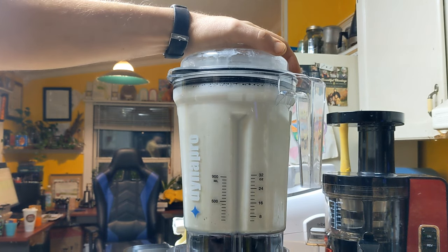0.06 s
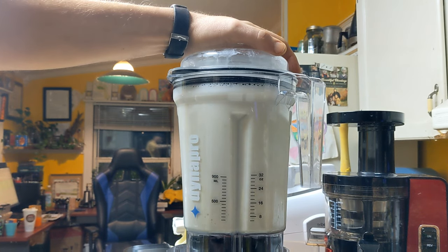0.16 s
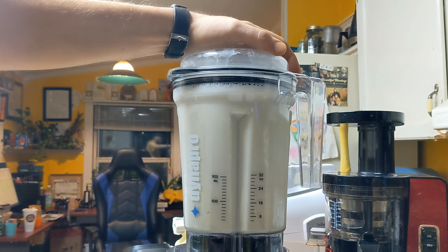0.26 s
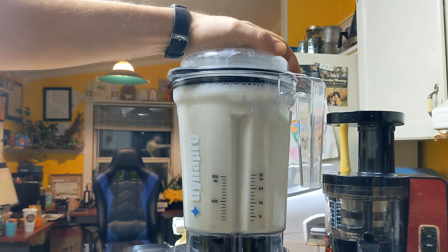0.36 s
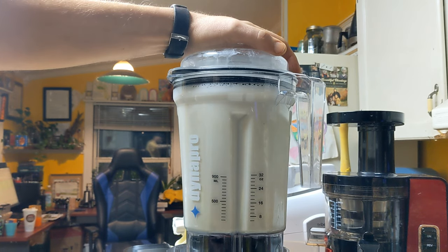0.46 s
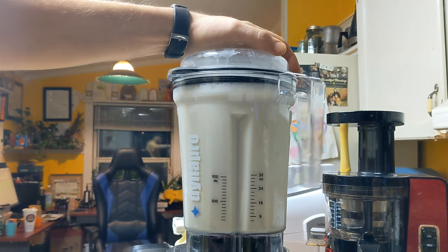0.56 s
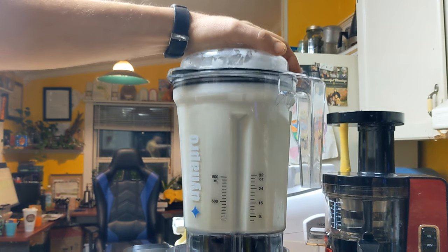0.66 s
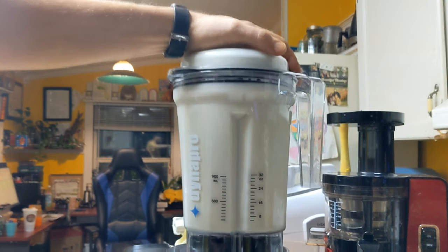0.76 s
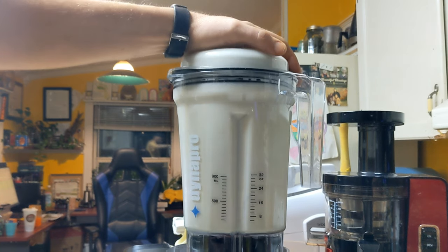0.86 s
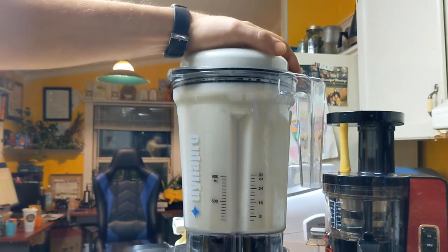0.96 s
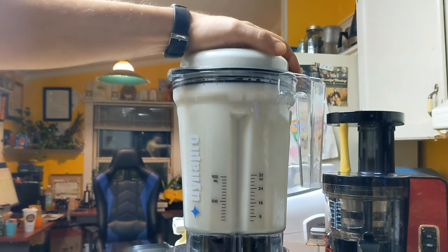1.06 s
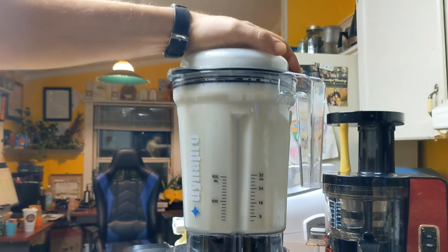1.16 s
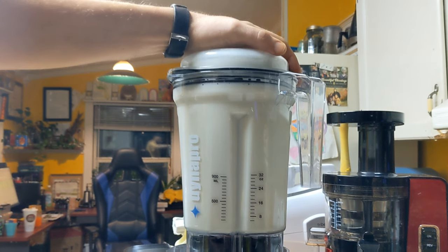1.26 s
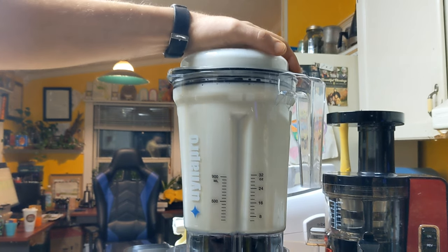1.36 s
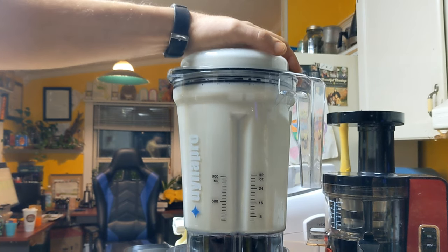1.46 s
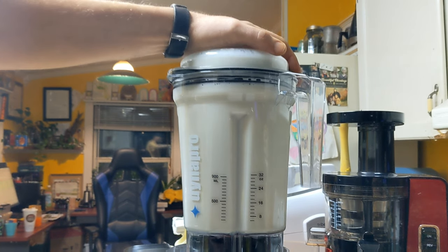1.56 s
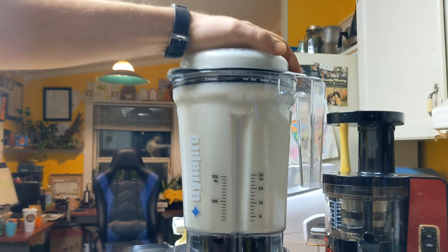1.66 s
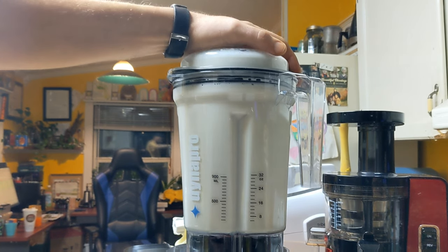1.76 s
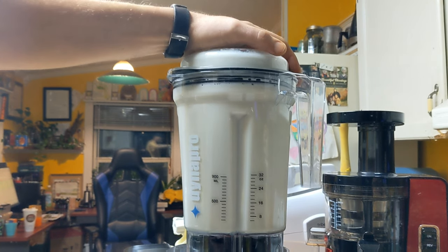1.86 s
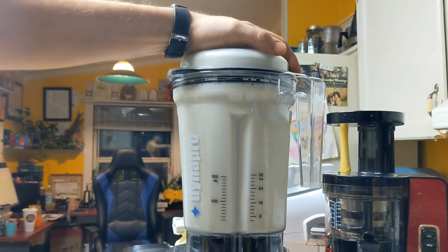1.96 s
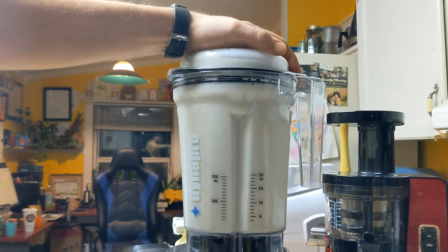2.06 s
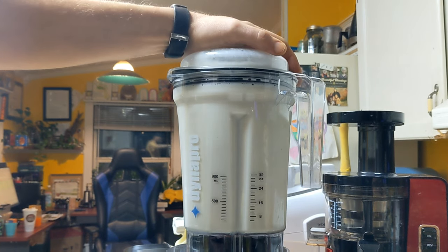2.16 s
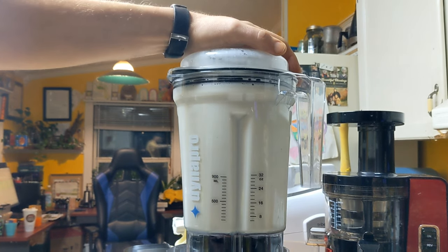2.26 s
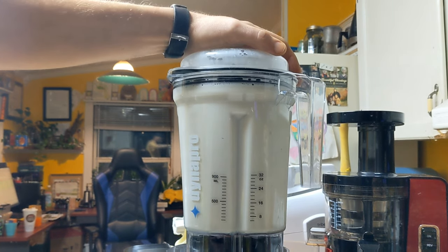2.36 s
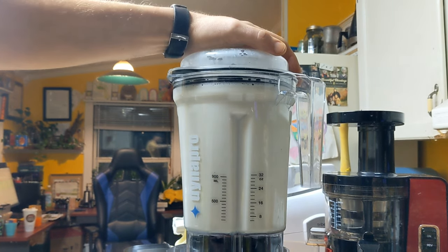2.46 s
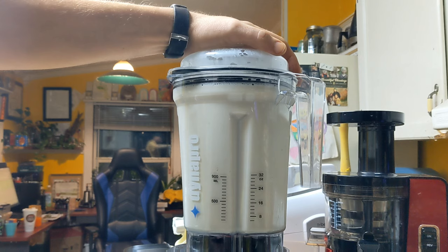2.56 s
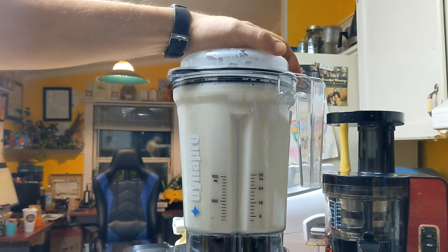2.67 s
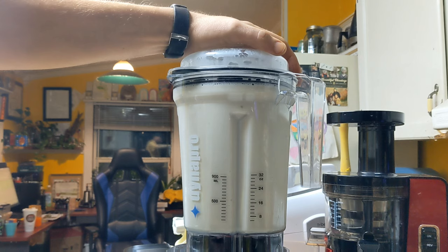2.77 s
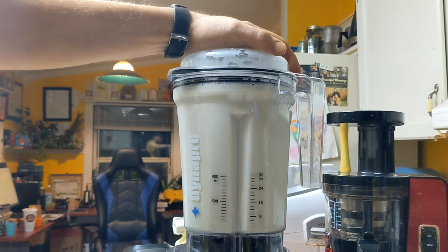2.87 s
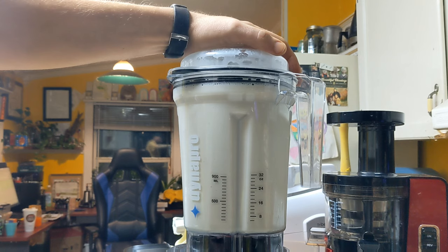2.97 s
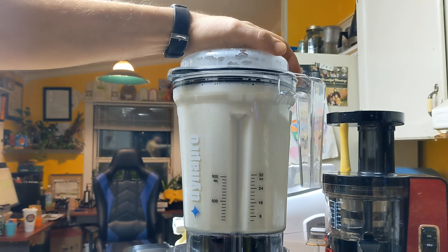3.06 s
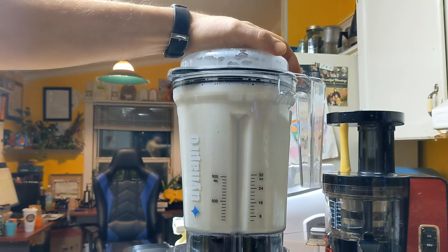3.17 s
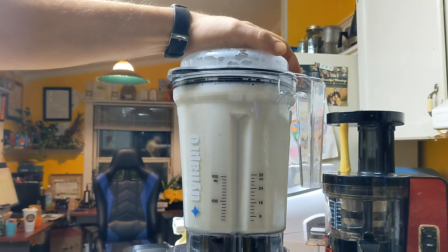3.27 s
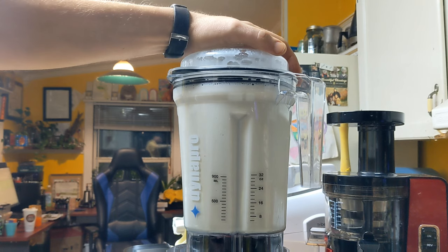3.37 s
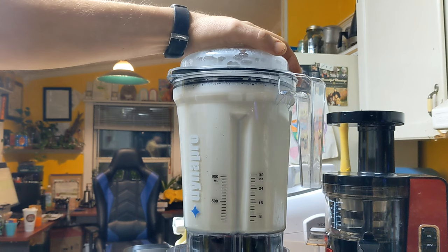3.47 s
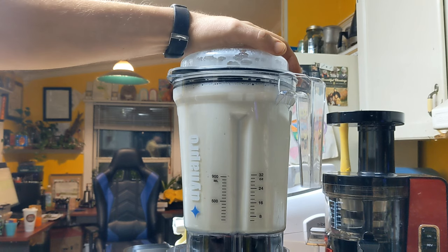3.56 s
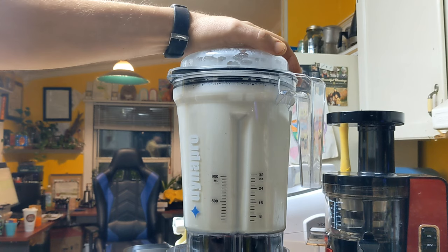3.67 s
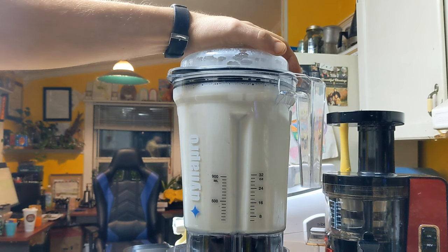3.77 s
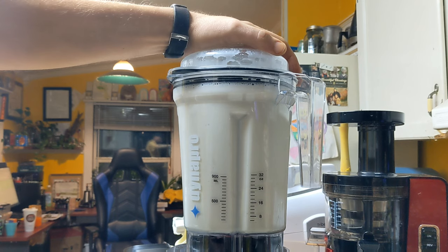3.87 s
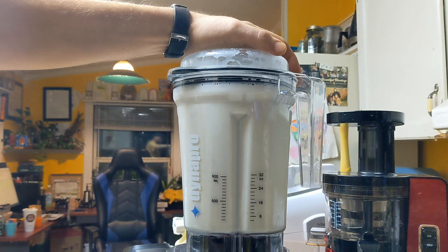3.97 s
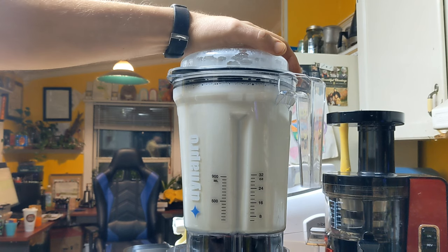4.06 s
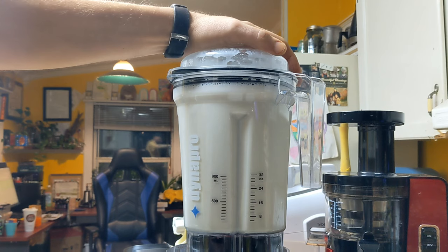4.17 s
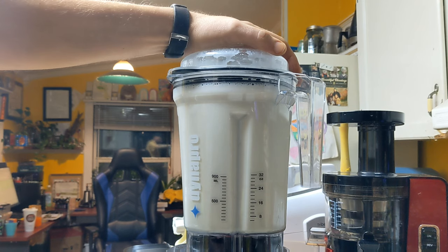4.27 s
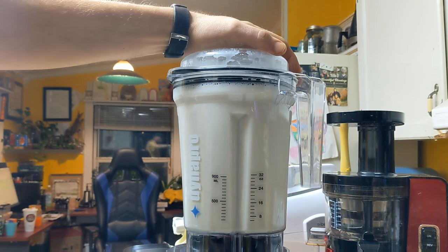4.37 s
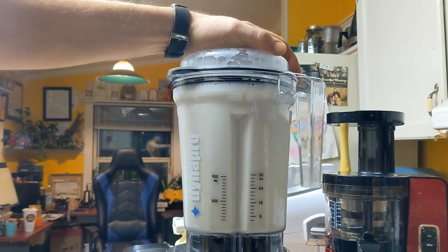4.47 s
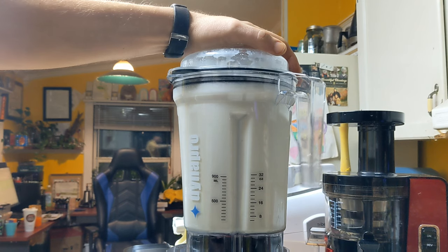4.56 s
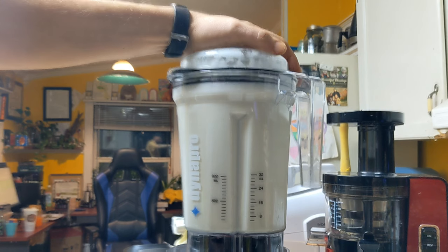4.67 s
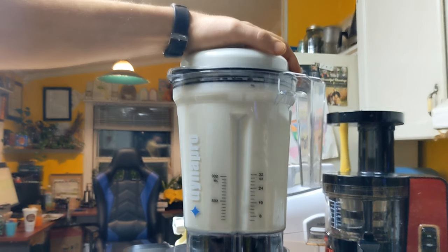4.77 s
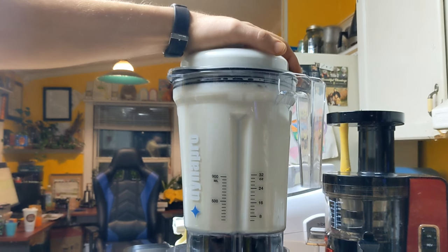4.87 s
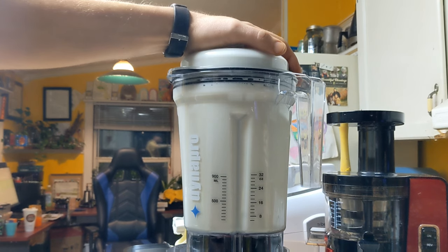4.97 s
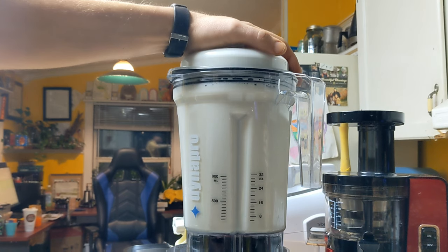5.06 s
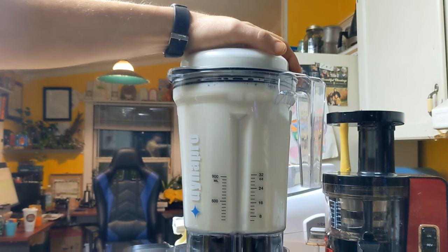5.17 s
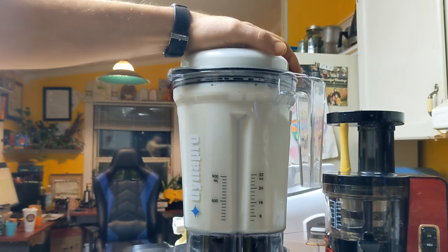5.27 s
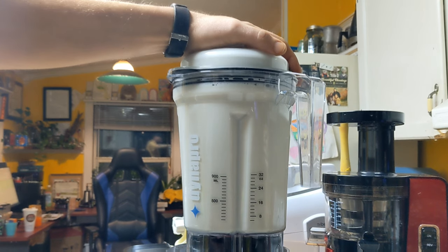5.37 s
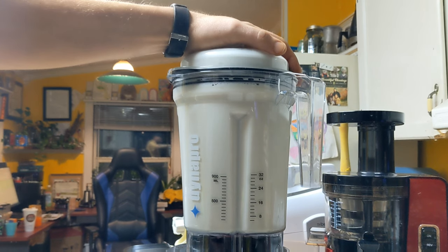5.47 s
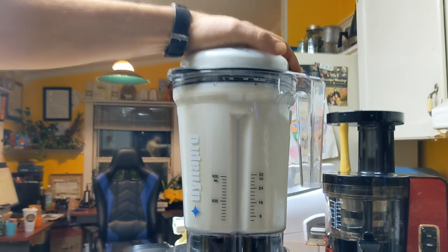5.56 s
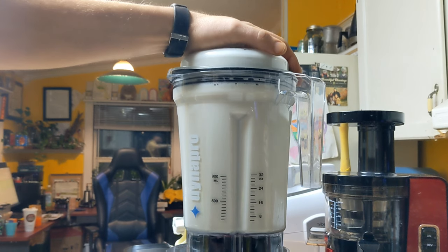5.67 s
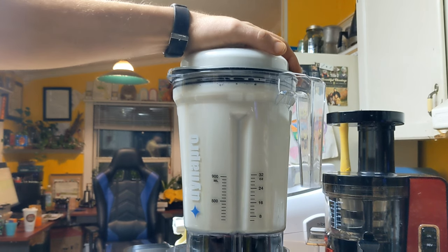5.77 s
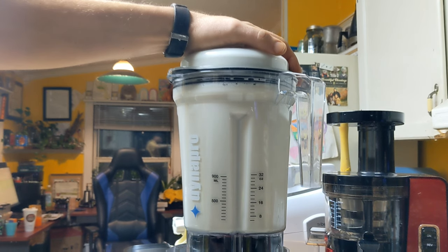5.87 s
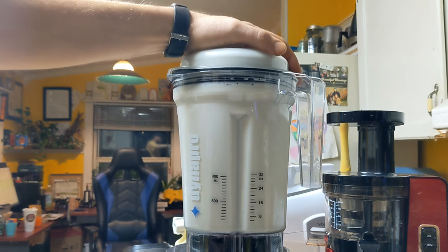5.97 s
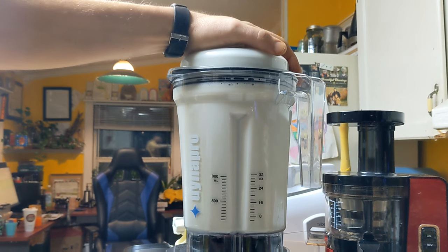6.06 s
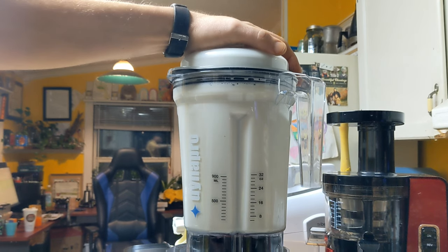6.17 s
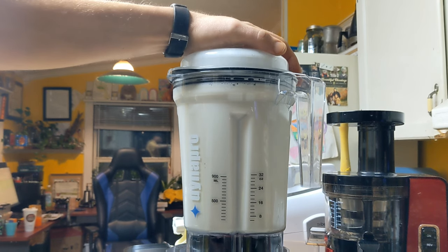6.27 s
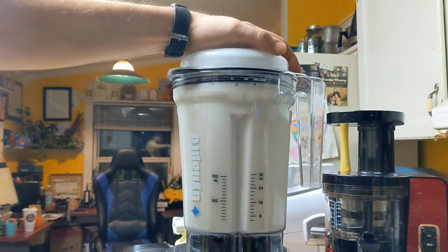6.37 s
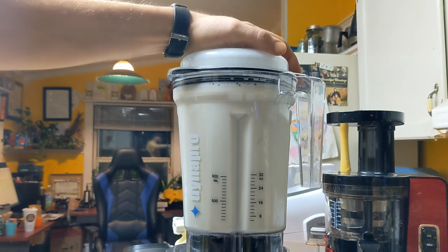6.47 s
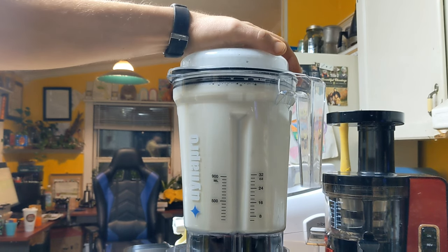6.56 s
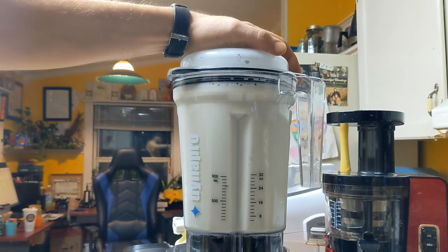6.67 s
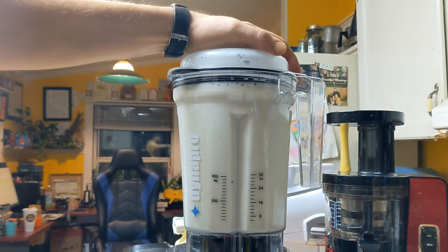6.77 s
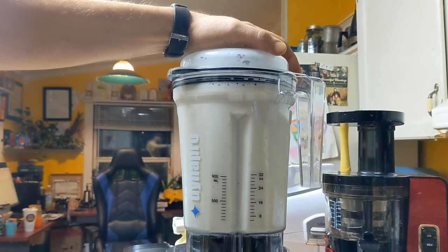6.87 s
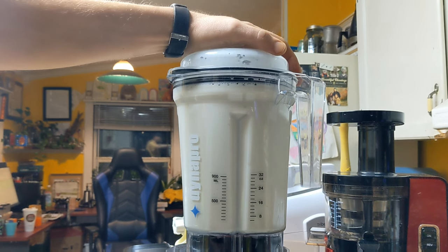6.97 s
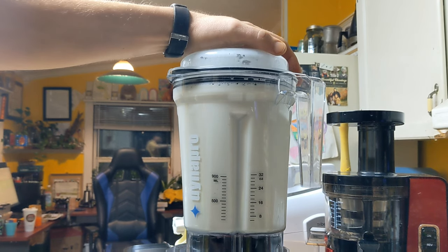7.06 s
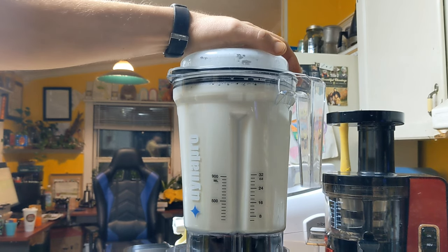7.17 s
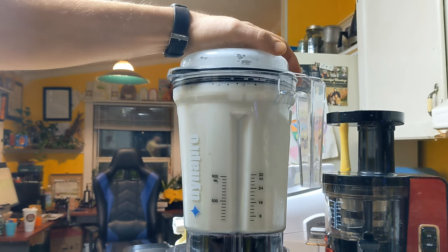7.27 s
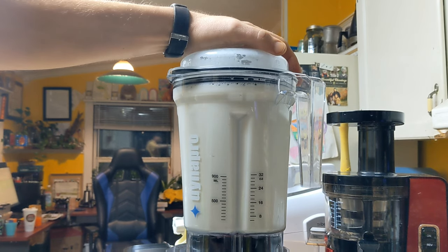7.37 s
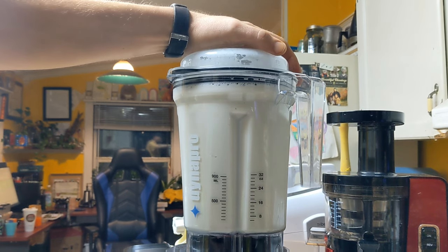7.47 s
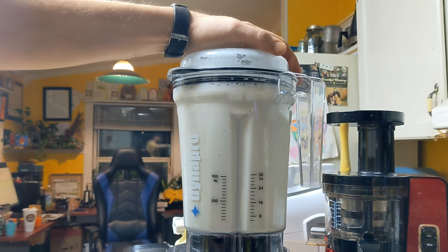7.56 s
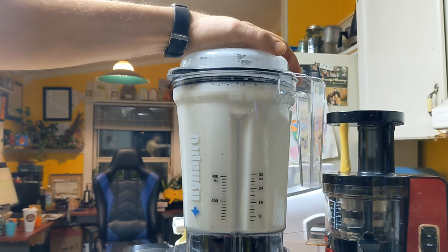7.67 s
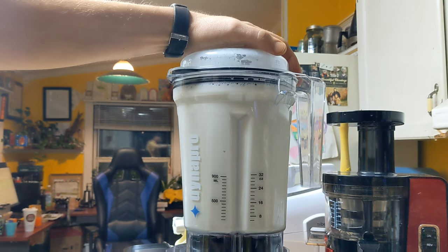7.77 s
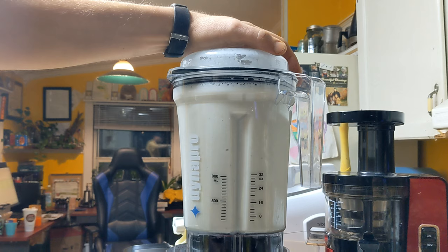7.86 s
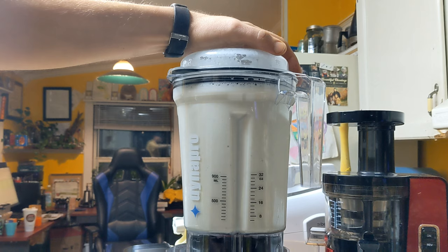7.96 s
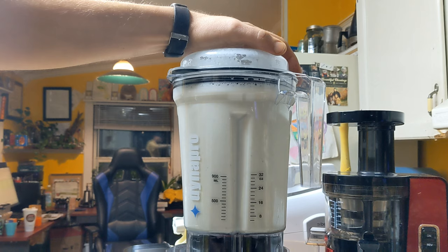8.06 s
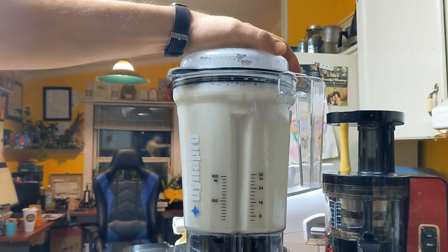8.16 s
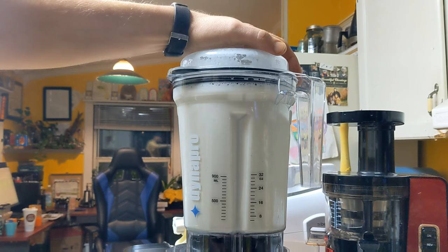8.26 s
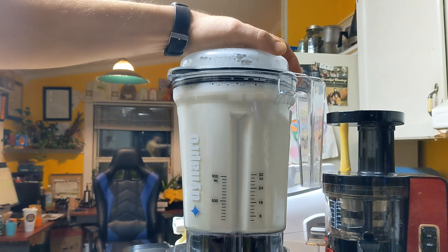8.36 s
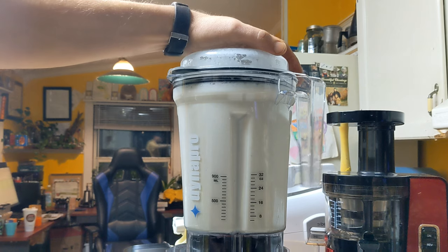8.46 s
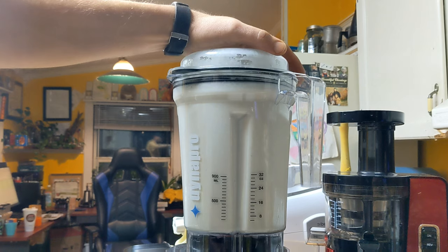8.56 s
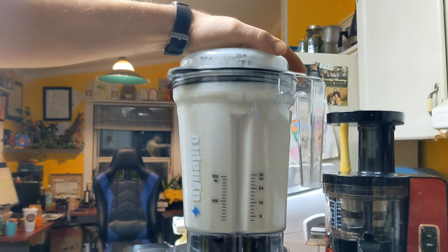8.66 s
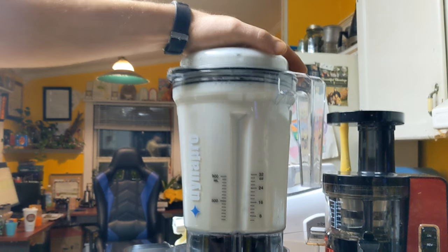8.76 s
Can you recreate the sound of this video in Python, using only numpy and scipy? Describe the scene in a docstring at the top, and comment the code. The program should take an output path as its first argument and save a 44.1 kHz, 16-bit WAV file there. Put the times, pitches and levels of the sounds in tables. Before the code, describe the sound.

Close stereo pickup of a high-speed blender holding nuts and water, in a quiet, faintly humming kitchen. At 0 s a rough mains buzz starts, with a small knock and rattling coupling near 0.15 s; churning swells as the motor glides upward, flaring at about 0.75 s. At 0.8 s the blades bite with a bright splash and a gulp. The pitch sags, recovers, and from 1 to 2.05 s a strong low drone around 200 Hz wavers beneath a dense wet roar, howling swirl and hissing spray. Power cuts; pitch drops and the swirl collapses by 2.6 s, leaving a soft steady hum slowly fading. At 4 s the second pulse repeats with stronger chatter, biting at 4.8 s, surging in pitch and loudness until 6.05 s, then coasting down by 6.7 s to a shorter, unsteady hum. Quiet until 8 s: clicks, buzz, chatter, a sharper knock, wind-up, a softer splash at 8.8 s, and an abrupt end.

```python
"""Kitchen: a jug blender full of nuts and water is pulsed three times; the sound ends as the third pulse bites.
Each pulse starts with a mains buzz (sine lines), the motor winds up (gliding tone) and the blades bite
with a splash. In the first two the blades drone under load (a tone shaped by the jug's resonance),
then the swirl of slosh, churn and spray (coloured noise and grains) dies away and a hum lingers.
"""
import sys
import numpy as np
from scipy import signal
from scipy.fft import rfft, irfft, next_fast_len
from scipy.io import wavfile
from scipy.ndimage import uniform_filter1d, minimum_filter1d

SR = 44100
rng = np.random.default_rng(int(sys.argv[2]) if len(sys.argv) > 2 else 0)


def master_out(mix):
    """Clip the mix to full scale and print it as 16-bit PCM to the path in sys.argv[1]."""
    frames = np.transpose(np.atleast_2d(mix))
    ceiling = np.clip(frames, -1, 1)
    pcm = np.round(ceiling * 32767).astype(np.int16)
    wavfile.write(sys.argv[1], SR, pcm)


N = 389403
TIME = np.arange(N) / SR
SIZE = next_fast_len(N)
BINS = np.maximum(np.fft.rfftfreq(SIZE, 1 / SR), 1)  # Hz

RECTIFIED_MAINS_HZ = 120.1
USUAL_PITCH_HZ = 207.9
# after switch-on the speed climbs evenly until the bite; the swirl has formed shortly after
SPIN_UP_S, SWIRL_DELAY_S = 0.8154, 0.115


def from_db(db):
    """Decibels to gain."""
    return 10 ** (np.asarray(db) / 20)


def rms_one(x):
    """Scale to unit power."""
    return x / np.sqrt(np.mean(x ** 2) + 1e-20)


def gate(spans, fade_s):
    """One inside each (from, to) span, fading linearly outside."""
    return sum(np.clip(1 + np.minimum(TIME - begin, end - TIME) / fade_s, 0, 1) for begin, end in spans)


def bump(centre_s, length_s):
    """Gaussian swell of height one."""
    return np.exp(-((TIME - centre_s) / length_s) ** 2)


def bursts(rows, attack_s=0.003):
    """Envelope of (start_s, level_db, length_s) events: fast attack, Gaussian fall."""
    return sum(from_db(level_db) * np.clip((TIME - start_s) / attack_s, 0, 1) * bump(start_s, length_s)
               for start_s, level_db, length_s in rows)


def at_bins(points):
    """A (freq_hz, value) table interpolated over log frequency."""
    hz, value = np.transpose(points)
    return np.interp(np.log(BINS), np.log(hz), value)


def white():
    """Two unrelated white noises."""
    return rng.standard_normal((2, N))


def drift(rate_hz):
    """Unit-power noise through two poles at rate_hz, made at SR / 20 and interpolated."""
    pole = np.exp(-40 * np.pi * rate_hz / SR)
    noise = rng.standard_normal(N // 20 + 4002)
    slow = signal.lfilter([1], [1, -2 * pole, pole * pole], noise)[4000:]
    return np.interp(np.arange(N) / 20, np.arange(len(slow)), rms_one(slow))


def grains(per_s, spread_db):
    """Impacts of nut pieces and collapsing bubbles; any level spread is exponential in dB."""
    sizes = from_db(spread_db * np.minimum(rng.exponential(1, N), 4))
    return rms_one(white() * sizes * (rng.random(N) < per_s / SR))


def turn(hz):
    """Running phase of a moving frequency."""
    return 2 * np.pi * np.cumsum(hz) / SR


# stereo likeness: freq_hz, correlation [-1..1]
LIKENESS = [(100, 0.94), (250, 0.93), (500, 0.89), (1000, 0.3), (2000, 0.57), (4000, 0.17), (12000, 0)]
# left over right: freq_hz, balance_db
BALANCE_DB = [(60, -1), (120, -2.5), (240, 1), (480, 0.5), (950, -4), (1890, 1), (3770, -1), (7520, 2.5),
              (15000, 2)]
LEFT_LEAD_S = 0.00008


def place(pair, shape_db):
    """Colour two unrelated signals and deal them to left and right as common and opposed sound."""
    mid, side = rfft(pair, SIZE) * from_db(shape_db)
    alike = np.clip(at_bins(LIKENESS), -0.99, 0.99)
    both = np.sqrt(1 + alike) * mid + np.sqrt(1 - alike) * side * [[1], [-1]]
    both = both * from_db(at_bins(BALANCE_DB) * [[0.5], [-0.5]])
    both[1] *= np.exp(-2j * np.pi * BINS * LEFT_LEAD_S)
    return irfft(both, SIZE)[:, :N] / np.sqrt(2)


# resonances of jug and motor housing: freq_hz, width_hz, lift_db
JUG = [(474, 33, 6.5), (521, 25, 2.5), (667, 52, 8), (1210, 19, 5), (1355, 50, 7.5), (1517, 110, 8.5),
       (1685, 42, 4.5), (2000, 45, 4.5), (2270, 150, 5), (2900, 130, 4.5), (3135, 73, 7), (3100, 90, 0.5),
       (4004, 32, 5.5), (4550, 80, 5), (6400, 150, 1.5), (7760, 200, -8), (10440, 66, 5),
       (12720, 230, -5.5)]


def jug_db():
    """Lift that the resonances give to sound inside the jug."""
    return sum(lift_db / (1 + (2 * (BINS - hz) / width_hz) ** 2) for hz, width_hz, lift_db in JUG)


# motor switching: on_s, off_s, coast_s (time to rest)
PULSES = [(0, 2.05, 0.56), (4, 6.05, 0.63), (8, 10.05, .62)]


def pulse_clock():
    """Current pulse: time since switch-on, time since switch-off, coasting time."""
    rows = np.array(PULSES)
    on, off, coast = rows[np.searchsorted(rows[1:, 0], TIME)].T
    return TIME - on, TIME - off, coast


def swirling(fade_s, overhang_s=0.06):
    """One from the formed swirl until overhang_s after the power is cut."""
    return gate([(on + SPIN_UP_S + SWIRL_DELAY_S, off + overhang_s) for on, off, coast in PULSES], fade_s)


# loaded blade pitch, one curve for each of the first two pulses: time_s, pitch_hz
LOAD_PITCH = [
    [(0.9, 155.5), (0.928, 171.3), (0.95, 190.8), (1.008, 206.3), (1.082, 224.3), (1.168, 226),
     (1.302, 202.8), (1.604, 207), (2.05, 201)],
    [(4.91, 170.2), (4.96, 193.3), (5.02, 221.1), (5.17, 222.3), (5.37, 204.1), (5.58, 219.9),
     (5.76, 208.3), (5.868, 220.1), (6.05, 207)],
]
FALL_HZ_PER_S = 680  # power off


def blade_pitch():
    """Pitch wanders with the load and drops once the power is cut."""
    since_off = pulse_clock()[1]
    time_s, pitch_hz = np.vstack(LOAD_PITCH).T
    loaded = np.interp(TIME, time_s, pitch_hz)
    return np.maximum(loaded - FALL_HZ_PER_S * np.maximum(since_off, 0), 60)


# drone lines: multiple_of_pitch, level_db
DRONE_ORDERS = [(1, -0.5), (2, -32.5), (3, -36.5), (4, -23.5)]


def drone(pitch, level_db, overtones_db=0):
    """Spinning blades shake the jug: a nearly pure tone with weak harmonics."""
    phase = turn(pitch * (1 + 0.0062 * drift(21)))
    tone = 0
    for order, order_db in DRONE_ORDERS:
        waver_db = 0.5 * drift(11) if order == 1 else overtones_db + 4 * drift(11)
        tone = tone + from_db(order_db + waver_db) * np.sin(round(order) * phase)
    return np.sqrt(2) * tone * from_db(level_db)


DRONE_DB, RESONANCE_HZ, RESONANCE_WIDTH_HZ = -12, 199.6, 17
RESONANCE_RISE_HZ_PER_S = 0.97  # the mix gets smoother and frothier
SLIP_HZ, SLIP_DB_PER_HZ = 214.2, 0.7  # above this the blades draw air and lose grip
RING_UP_S = 0.019


def loaded_drone(pitch):
    """The drone swells as its pitch dwells on the full jug's resonance, which lags to build and fade."""
    resonance_hz = RESONANCE_HZ + RESONANCE_RISE_HZ_PER_S * TIME
    detuned_db = 10 * np.log10(1 + (2 * (pitch - resonance_hz) / RESONANCE_WIDTH_HZ) ** 2)
    slip_db = SLIP_DB_PER_HZ * np.maximum(pitch - SLIP_HZ, 0)
    keep = np.exp(-1 / (RING_UP_S * SR))
    loss_db = signal.lfilter([1 - keep], [1, -keep], detuned_db) + slip_db
    return drone(pitch, DRONE_DB - loss_db) * swirling(fade_s=0.048, overhang_s=0.022)


# wind-up flares on a resonance: peak_s, pitch_hz, level_db
WIND_UPS = [(.757, 237, -9.5), (4.693, 229, -9), (8.652, 228.3, -9)]
GLIDE_HZ_PER_S, LINGER_S, FLARE_RISE_S, FLARE_FALL_S = 800, 0.035, 0.037, 0.049


def wind_up():
    """The drone glides up, lingers and flares at a resonance, and is cut off at the bite."""
    rows = np.array(WIND_UPS)
    later_starts = [on for on, off, coast in PULSES[1:]]
    peak_s, hz, level_db = rows[np.searchsorted(later_starts, TIME)].T
    past = np.clip(TIME - peak_s, -0.2, 0.2)
    pitch = hz + GLIDE_HZ_PER_S * (past - LINGER_S * np.tanh(past / LINGER_S))
    spans = [(flare[0] - 0.1, pulse[0] + SPIN_UP_S) for flare, pulse in zip(WIND_UPS, PULSES)]
    sweep_s = np.where(past < 0, FLARE_RISE_S, FLARE_FALL_S)
    flare_gain = gate(spans, fade_s=0.011) / (1 + (past / sweep_s) ** 2)
    return drone(pitch, level_db, overtones_db=-2) * flare_gain


# nominal level at full speed, sink towards rest, bend of the climb (1 = evenly in dB)
SLOSH_DB, SLOSH_RANGE_DB, SLOSH_BEND = -40.5, 36, 1.5
CHURN_DB, CHURN_RANGE_DB, CHURN_BEND = -15.5, 54.5, 1.35
SPRAY_DB, SPRAY_RANGE_DB, SPRAY_BEND = -34.5, 50.5, 1.16
COAST_BEND = 1.084  # above 1 the swirl carries on at first, then collapses
BOG_DELAY_S, BOG_S, BOG_DB = 0.11, 0.06, 3.5  # blades bog down after the bite
HEAVE_DB, HEAVE_S = 7.5, 0.053
BITE_SPRAY_DB, BITE_S = 4, 0.035
SWIRL_SPRAY_DB, SPRAY_DB_PER_HZ = 10, 0.2
SPRAY_RISE_DB_PER_S = 0.76  # before the swirl; a smoother, frothier mix sprays more easily


def flow_levels(pitch):
    """Slosh, churn and spray in dB follow the speed, which ramps up, holds and coasts down."""
    since_on, since_off, coast = pulse_clock()
    since_bite = since_on - SPIN_UP_S
    coasting = 1 - (np.maximum(since_off, 0) / coast) ** COAST_BEND
    speed = np.clip(np.minimum(since_on / SPIN_UP_S, coasting), 0, 1)
    swirl = np.clip(since_bite / 0.16, 0, 1)

    slosh_sink_db = SLOSH_RANGE_DB * (1 - speed) ** SLOSH_BEND * (1 - 0.27 * swirl)
    heave_db = HEAVE_DB * np.exp(-(since_bite / HEAVE_S) ** 2)
    slosh_db = SLOSH_DB - slosh_sink_db + heave_db + 1.5 * drift(4)

    bog_db = BOG_DB * np.exp(-((since_bite - BOG_DELAY_S) / BOG_S) ** 2)
    churn_db = CHURN_DB - CHURN_RANGE_DB * (1 - speed) ** CHURN_BEND - bog_db

    racing_hz = np.clip(pitch - USUAL_PITCH_HZ, -8, 25)
    swirl_db = swirl * speed * (SWIRL_SPRAY_DB + SPRAY_DB_PER_HZ * racing_hz)
    rise_db = (1 - swirl) * SPRAY_RISE_DB_PER_S * TIME
    bite_db = BITE_SPRAY_DB * np.exp(-(since_bite / BITE_S - 0.7) ** 2)
    spray_db = SPRAY_DB - SPRAY_RANGE_DB * (1 - speed) ** SPRAY_BEND + swirl_db + rise_db + bite_db
    return slosh_db, churn_db, spray_db


# liquid spectra: freq_hz, density_db (relative, per Hz)
SLOSH = [(25, -21.5), (45, -12), (70, 0), (95, -2.5), (122, 5), (150, 3), (260, -26)]
CHURN = [(130, -30), (200, 4.5), (280, 2), (380, -2.5), (560, 1), (800, -0.5), (1000, -4), (1250, -2.5),
         (1600, -3.5), (2300, -7), (2700, -8.5), (3200, -8), (3600, -24.5), (6000, -44)]
SPRAY = [(2000, -29.5), (3400, 0.5), (3530, -3), (3930, -1.5), (4250, -4), (7060, -6), (7660, -6),
         (10300, -9.5), (14100, -11.5), (15500, -17.5)]


def liquid(pitch, slosh_db, churn_db, spray_db):
    """Slosh noise, churn grains and spray; the last two surge with passing blades and lumps in the flow."""
    lumps = from_db(1.07 * drift(35) + 0.29 * drift(8.2))
    chop = lumps * (1 + 0.067 * np.cos(turn(pitch * (1 + 0.04 * drift(25)))))
    ripple = 1 + 0.09 * np.cos(2 * np.pi * RECTIFIED_MAINS_HZ * TIME)
    slosh = rms_one(place(white(), at_bins(SLOSH)))
    churn_grains = chop * ripple * grains(per_s=6000, spread_db=0.5)
    churn = rms_one(place(churn_grains, at_bins(CHURN) + jug_db()))
    spray_mix = chop * (grains(per_s=2500, spread_db=0) + 2.5 * white())
    spray = rms_one(place(spray_mix, at_bins(SPRAY) + jug_db()))

    # more spray turns the churn from gurgle to bright roar
    froth_db = np.clip(spray_db - churn_db + 7, -12, 4)
    gurgle = signal.sosfiltfilt(signal.butter(2, 450, fs=SR, output="sos"), churn)
    roar = signal.sosfiltfilt(signal.butter(2, 2100, "high", fs=SR, output="sos"), churn)
    gurgle_change = gurgle * (from_db(-0.5 * froth_db) - 1)
    roar_change = roar * (from_db(1.1 * froth_db + 4.5) - 1)
    churn = churn + gurgle_change + roar_change

    # churn and spray are slightly weaker until the shaft breaks loose
    stuck = gate([(start - 0.2, start + length) for start, db, length in CHATTER], fade_s=0.06)
    stirred = gate([(on + 0.06, off + coast - 0.08) for on, off, coast in PULSES], fade_s=0.11)
    settling = gate([(on + 0.33, off + coast) for on, off, coast in PULSES], fade_s=0.49)
    moving = churn * from_db(churn_db - stuck) + spray * from_db(spray_db - 2.9 * stuck)
    return settling * slosh * from_db(slosh_db) + stirred * moving


# wavering vortex tones: freq_hz (at usual speed), width_hz, level_db (against the churn)
VORTEX = [(255.5, 2.6, -15), (466, 23, -10), (644.3, 10, -13.5), (883, 10, -9.5), (1120, 22, -13.5)]


def vortex(pitch, churn_db):
    """The formed swirl howls in narrow, unsteady bands that bend with the speed."""
    speed = pitch / USUAL_PITCH_HZ
    phase = turn(np.maximum(speed, 0.96) ** 0.65)
    pair = []
    for channel in range(2):
        tones = 0
        for hz, width_hz, level_db in VORTEX:
            band = drift(width_hz) * np.cos(hz * phase) + drift(width_hz) * np.sin(hz * phase)
            tones = tones + from_db(level_db) * band
        pair.append(tones)
    formed = np.clip((speed - 0.86) / 0.033, 0, 1) * swirling(fade_s=0.02, overhang_s=0.03)
    return place(np.array(pair), 0) * from_db(churn_db) * formed


# blades fling liquid at the wall: start_s, level_db, length_s
SPLASHES = [(0.78, -5.5, 0.049), (4.783, -10.5, 0.035), (8.783, -14, 0.16)]


def splashes():
    """Short bright crashes of liquid and nuts on the wall: grain bursts coloured by the jug."""
    colour = at_bins([(150, -27.5), (400, -9), (1000, -1.5), (1700, 0.5), (3100, -3.5), (4000, -9.5),
                      (9000, -14), (15000, -18)])
    crash = rms_one(place(grains(per_s=9000, spread_db=1.5), colour + jug_db()))
    return bursts(SPLASHES, attack_s=0.016) * crash


# air pockets gulp in the liquid: centre_s, level_db, length_s, start_hz, end_hz
GULPS = [(0.84, -21.5, 0.032, 385, 425), (4.816, -21.5, 0.061, 350, 445), (4.856, -23.5, 0.047, 185, 198.8),
         (4.863, -35, 0.022, 50, 65.6), (2.445, -47, .06, 80, 69.5), (6.558, -45, 0.032, 62, 57.4)]


def gulps():
    """Each air pocket swells into a short gliding tone."""
    out = 0
    for centre_s, level_db, length_s, start_hz, end_hz in GULPS:
        pitch = np.interp(TIME, [centre_s - length_s, centre_s + length_s], [start_hz, end_hz])
        tone = np.sqrt(2) * np.sin(turn(pitch))
        out = out + from_db(level_db) * bump(centre_s, length_s) * tone
    return out


# upper buzz lines: multiple_of_rectified_mains, level_db
BUZZ_ORDERS = [(3, -6), (4, -10.5), (5, -10), (6, -4.5), (7, -12.5)]
# soft start: delay, then a rise with the current up to a ceiling
BUZZ_DELAY_S, BUZZ_START_DB, BUZZ_RISE_DB_PER_S, BUZZ_TOP_DB = 0.04, -53.5, 47, -37
UPPER_START_DB, UPPER_RISE_DB_PER_S, UPPER_TOP_DB = -63, 92, -44
STRAIN_DB = 11.5  # above the chatter


def buzz(churn_db):
    """Chopped mains current buzzes the motor, rougher as the liquid starts to move."""
    powered_s = pulse_clock()[0] - BUZZ_DELAY_S
    level = from_db(np.minimum(BUZZ_START_DB + BUZZ_RISE_DB_PER_S * powered_s, BUZZ_TOP_DB))
    # swells while the shaft strains, eases once it is free
    strain = sum(from_db(level_db + STRAIN_DB) * bump(start_s + 0.63 * length_s, 0.5 * length_s)
                 for start_s, level_db, length_s in CHATTER)
    relief = sum(bump(start_s + 0.12, 0.057) for start_s, level_db, length_s in CHATTER)
    rough = np.clip((churn_db + 50) / 25, 0.15, 1)
    phase = turn(RECTIFIED_MAINS_HZ * (1 + 0.017 * rough * drift(20)))
    main_gain = (level * from_db(-5 * relief) + strain) * from_db(7.7 * rough * drift(25))
    main = main_gain * np.sin(2 * phase)

    # upper lines flutter, rise with the current, dissolve as the liquid takes over
    upper = 0
    for order, order_db in BUZZ_ORDERS:
        line = np.sin(round(order) * phase + 0.7 * drift(12))
        upper = upper + from_db(order_db + 3.5 * drift(25)) * line
    upper = upper * from_db(np.minimum(UPPER_START_DB + UPPER_RISE_DB_PER_S * powered_s, UPPER_TOP_DB))
    upper = upper * np.clip((0.62 - powered_s) / 0.23, 0, 1)
    buzzing = np.clip(1 + powered_s / 0.012, 0, 1) * np.clip((0.66 - powered_s) / 0.065, 0, 1)

    # the lowest line swells with the torque until the bite
    starting = gate([(on + 0.18, on + SPIN_UP_S) for on, off, coast in PULSES], fade_s=0.04)
    torque_db = np.minimum(1.41 * churn_db, -26) - 3.5 + 2 * drift(18)
    lowest = from_db(torque_db) * starting * np.sin(phase)
    return np.sqrt(2) * ((main + upper) * buzzing + lowest)


# knocks of the drive and of nuts in the jug: peak_s, level_db
KNOCKS = [(0.123, -53), (2.619, -63), (4.033, -64), (8.084, -61), (8.131, -57), (8.227, -39.5)]
# coupling chatters as the shaft breaks loose: start_s, level_db, length_s
CHATTER = [(.165, -50.5, 0.039), (4.18, -42, 0.066), (8.173, -42, 0.085)]
# modes of coupling and base: freq_hz, half_width_hz, level_db
COUPLING = [(860, 36, 11.5), (1420, 310, 3.5), (1560, 110, -1), (1750, 55, 2), (2300, 130, 1.5),
            (3070, 270, -6), (8900, 3700, -28)]


def knocks():
    """Single knocks, and chatter at every kick of the rectified mains: noise ringing in the base."""
    blows = sum(from_db(level_db) * (TIME >= peak_s) * np.exp(-np.abs(TIME - peak_s) / 0.019)
                for peak_s, level_db in KNOCKS)
    kicks = rms_one(np.exp(-(TIME * RECTIFIED_MAINS_HZ % 1) / 0.5))
    power = sum(from_db(2 * level_db) / (1 + ((BINS - hz) / half_width_hz) ** 2) ** 2
                for hz, half_width_hz, level_db in COUPLING)
    strikes = (blows + kicks * bursts(CHATTER)) * white()
    return place(strikes, 10 * np.log10(power / power.mean()))


# drive takes up its slack: start_s, level_db
TICKS = [(.127, -74), (4.079, -68), (4.129, -63), (8.083, -62), (8.13, -62)]


def ticks():
    """Small bright clicks: noise bursts that die at once."""
    colour = at_bins([(1500, -15), (4000, 0), (6000, 8), (10000, -7), (15000, -26)])
    clicks = bursts([(start_s, level_db, 0.011) for start_s, level_db in TICKS])
    return clicks * rms_one(place(white(), colour))


# hum after the first two stops: start_s, pitch_hz, level_db, t60_s, unsteady_share [0..1]
RINGS = [(2.201, 203, -32.5, 3.1, 0), (6.3, 212.8, -34, 1.45, 0.61)]


def ringing():
    """A hum near the drone's pitch hangs on after a stop and decays exponentially."""
    out = 0
    for start_s, hz, level_db, t60_s, unsteady in RINGS:
        since = TIME - start_s
        fade = from_db(level_db - 60 * np.abs(since) / t60_s) * np.clip(1 + since / 0.036, 0, 1)
        waver = np.sqrt(2) * (1 - unsteady) + unsteady * (drift(12) + 1j * drift(30))
        out = out + fade * np.real(waver * np.exp(2j * np.pi * hz * TIME))
    return out


def faint_hiss():
    """A thin band of noise comes and goes in the first pause."""
    colour = at_bins([(1900, -25), (2320, 3.5), (2750, -19.5), (4600, -8.5), (9000, -17)])
    return from_db(-74) * bump(3.3, 0.49) * rms_one(place(white(), colour))


# kitchen spectrum: freq_hz, density_db (relative, per Hz)
ROOM_TONE = [(18, -62.5), (30, -36), (83, -5), (105, -3.5), (129, -18), (228, -1), (364, -17.5), (394, -12),
             (581, -13.5), (905, -25.5), (1170, -24.5), (1560, -28.5), (2250, -30.5), (2490, -29.5),
             (15000, -42)]
ROOM_TONE_DB = -61.5


def room_tone():
    """The quiet hum of the kitchen: steady coloured noise."""
    return from_db(ROOM_TONE_DB) * rms_one(place(white(), at_bins(ROOM_TONE)))


def scene():
    """The blender over the kitchen's hum."""
    pitch = blade_pitch()
    slosh_db, churn_db, spray_db = flow_levels(pitch)
    motor = loaded_drone(pitch) + wind_up() + buzz(churn_db) + knocks() + ticks()
    contents = liquid(pitch, slosh_db, churn_db, spray_db) + vortex(pitch, churn_db) + splashes() + gulps()
    # leans left, less so while the swirl fills the jug
    lean_db = 1.5 - 1.1 * swirling(fade_s=0.19)
    blender = (motor + contents + ringing()) * from_db(lean_db * [[0.5], [-0.5]])
    return blender + room_tone() + faint_hiss()


CUTOFF_HZ = 15450


def record(dry):
    """A quick limiter holds peaks to 0.97 of full scale, then a steep lowpass cuts the top."""
    span = round(0.006 * SR)
    allowed = 0.97 / np.maximum(np.abs(dry).max(axis=0), 0.97)
    gain = uniform_filter1d(minimum_filter1d(allowed, span), span)
    lowpass = signal.ellip(10, 0.1, 80, CUTOFF_HZ, fs=SR, output="sos")
    return signal.sosfilt(lowpass, dry * gain)


dry = scene()
out = record(dry)
master_out(out)
```